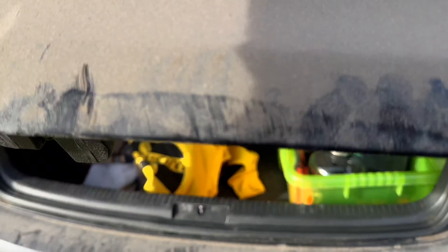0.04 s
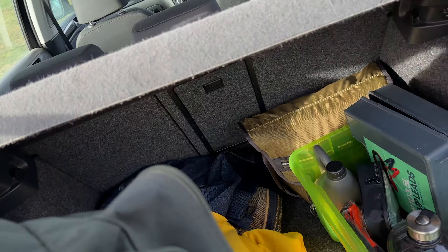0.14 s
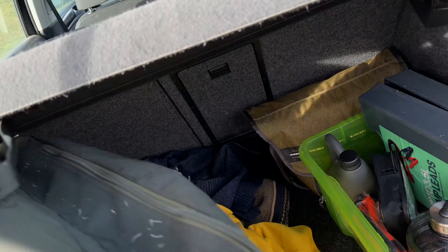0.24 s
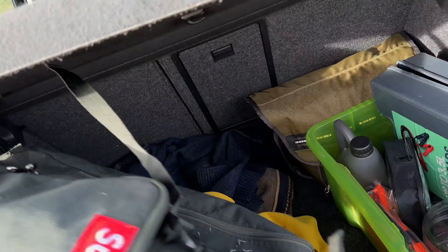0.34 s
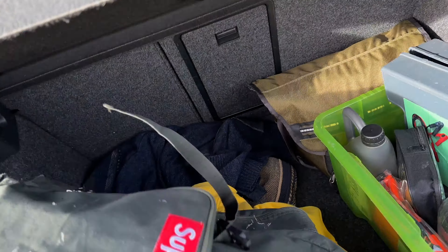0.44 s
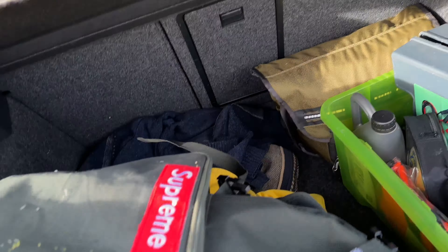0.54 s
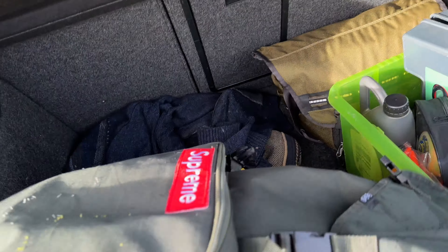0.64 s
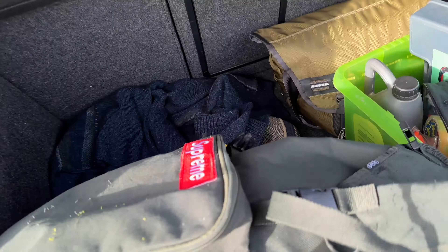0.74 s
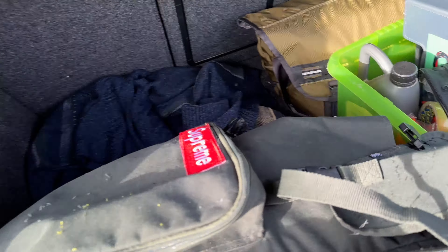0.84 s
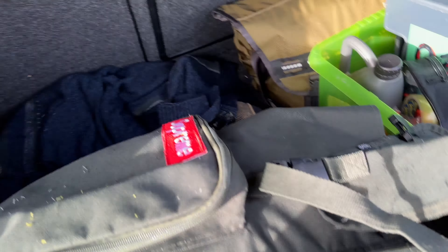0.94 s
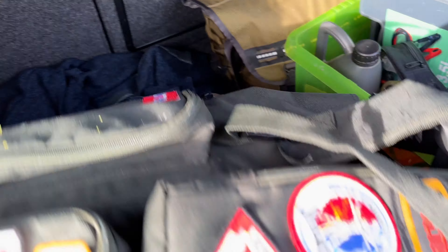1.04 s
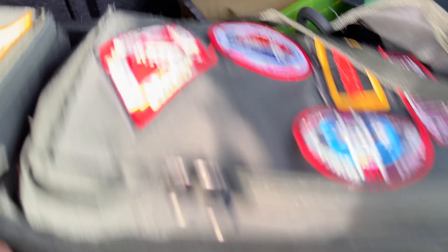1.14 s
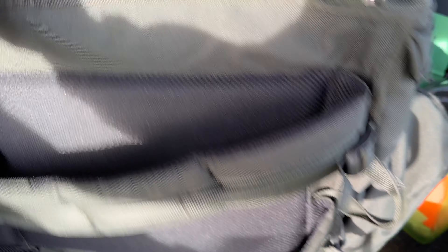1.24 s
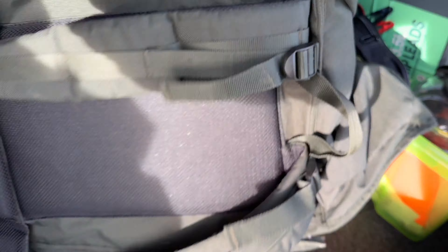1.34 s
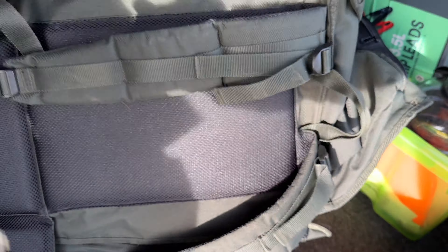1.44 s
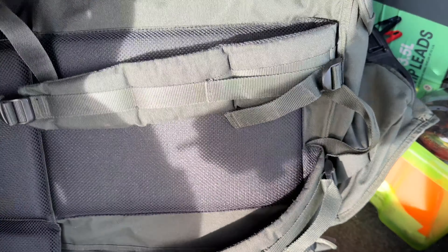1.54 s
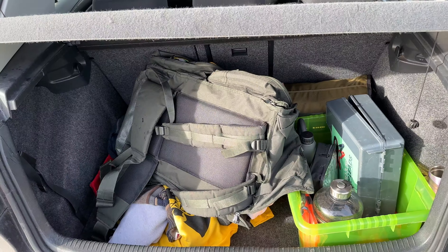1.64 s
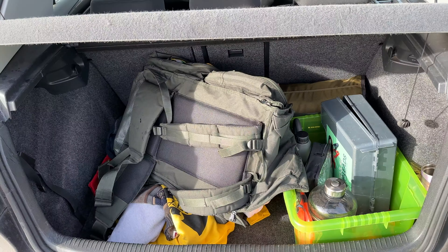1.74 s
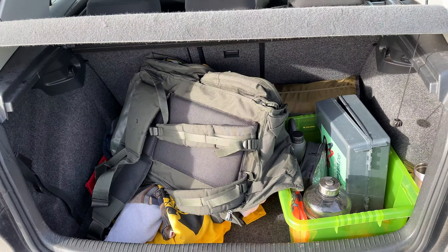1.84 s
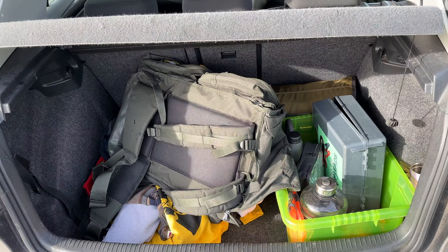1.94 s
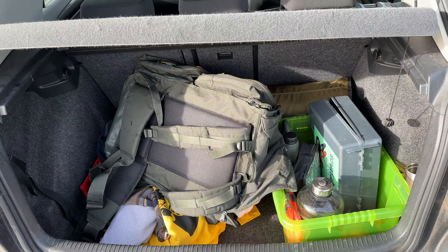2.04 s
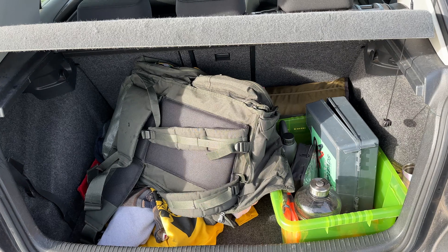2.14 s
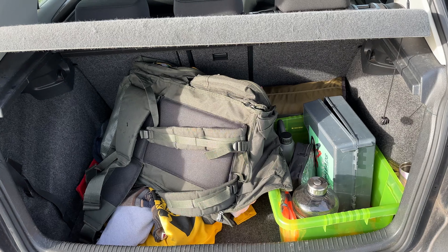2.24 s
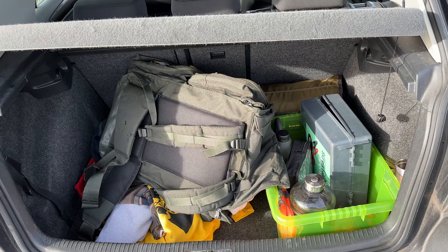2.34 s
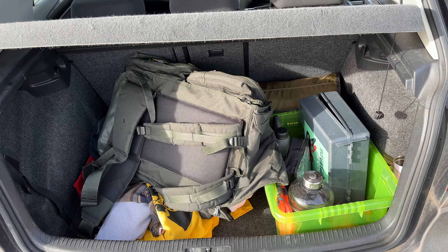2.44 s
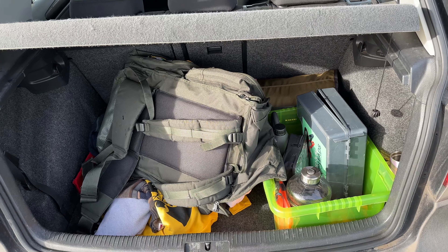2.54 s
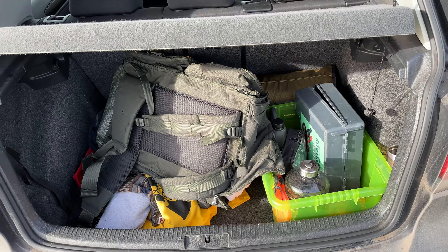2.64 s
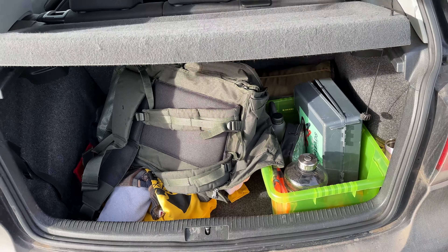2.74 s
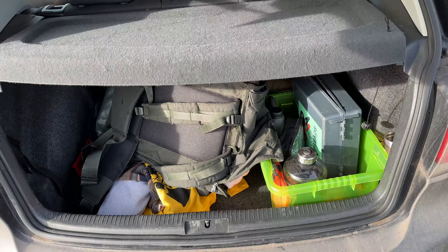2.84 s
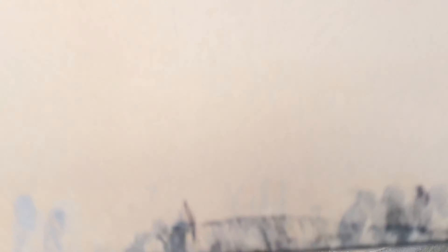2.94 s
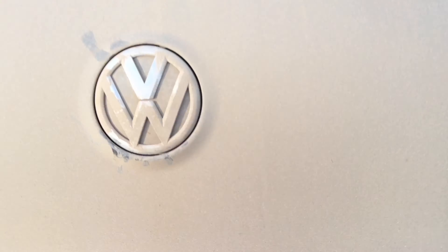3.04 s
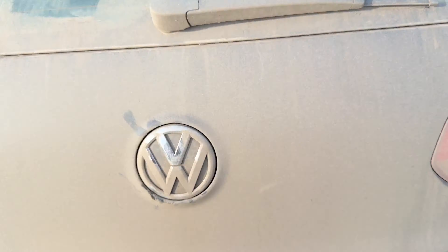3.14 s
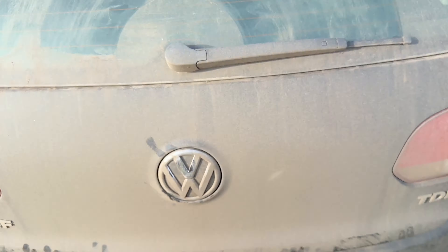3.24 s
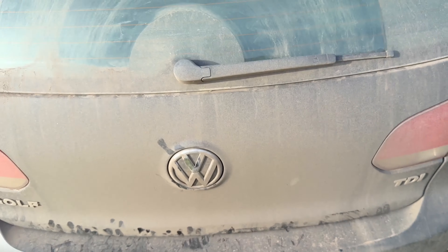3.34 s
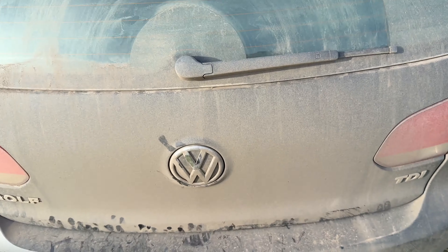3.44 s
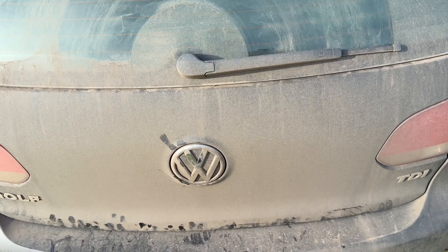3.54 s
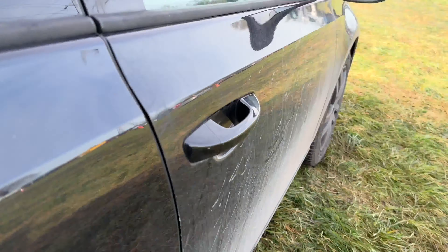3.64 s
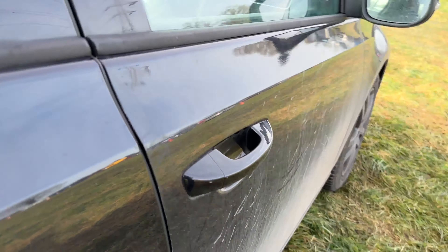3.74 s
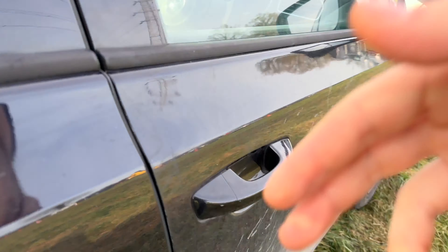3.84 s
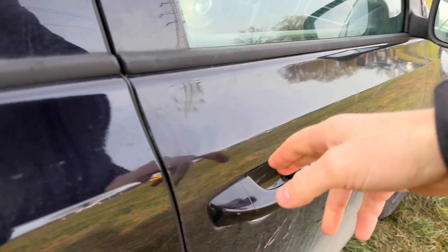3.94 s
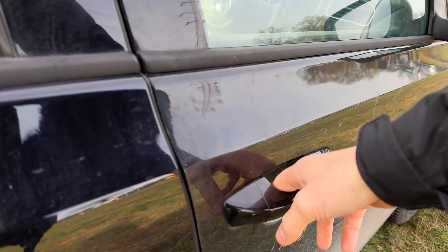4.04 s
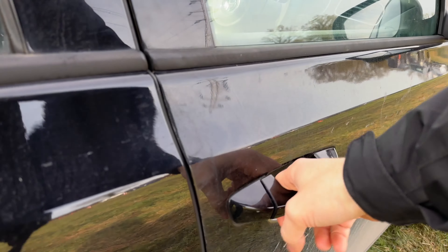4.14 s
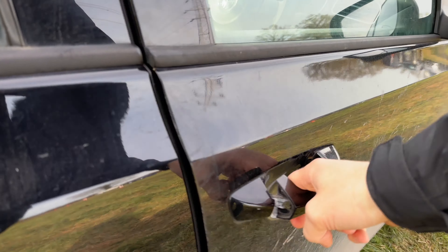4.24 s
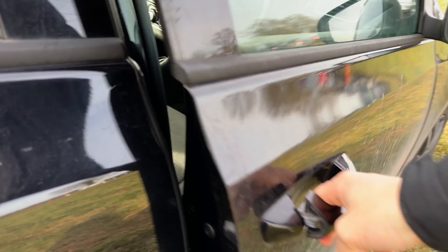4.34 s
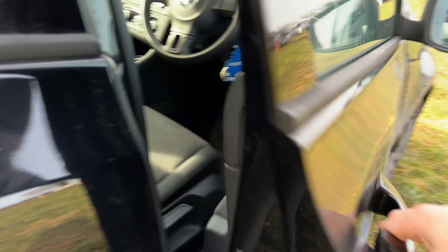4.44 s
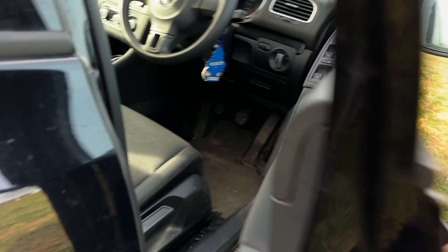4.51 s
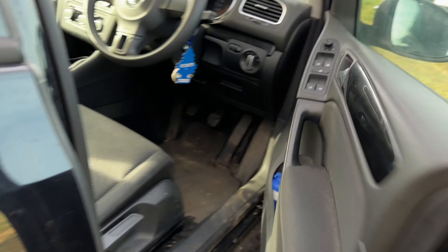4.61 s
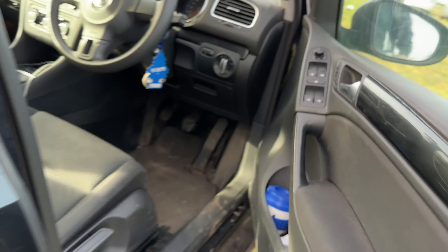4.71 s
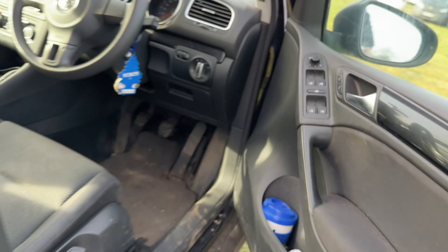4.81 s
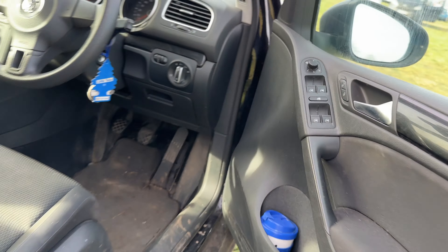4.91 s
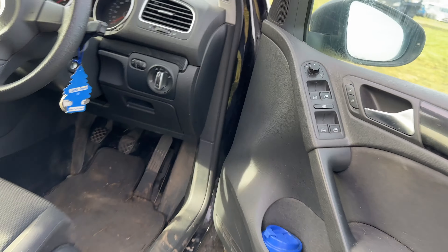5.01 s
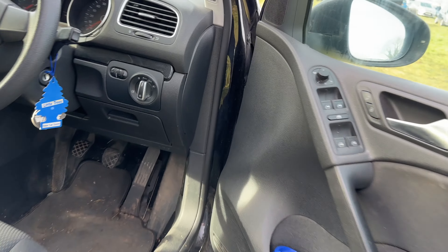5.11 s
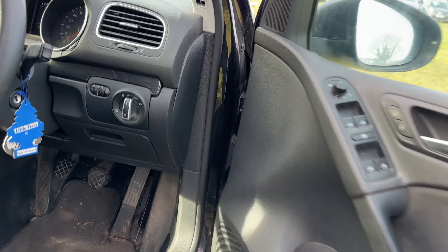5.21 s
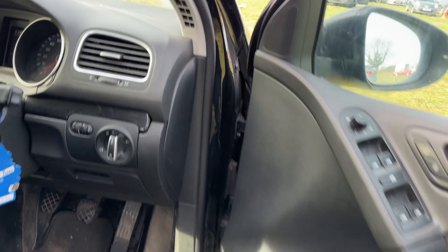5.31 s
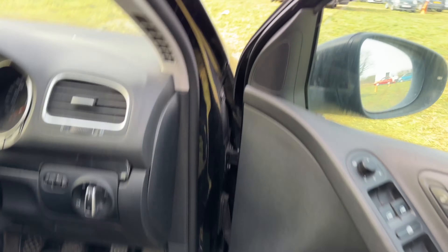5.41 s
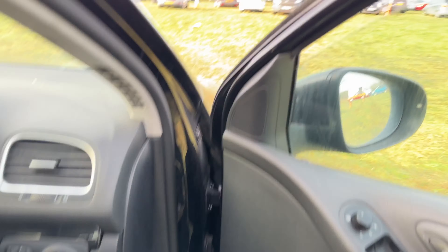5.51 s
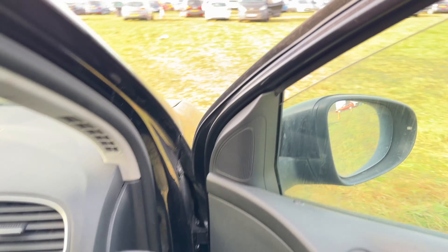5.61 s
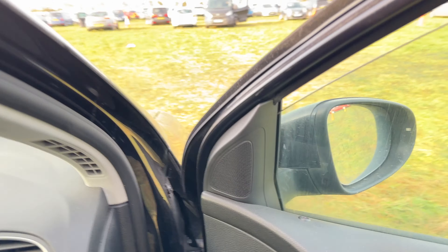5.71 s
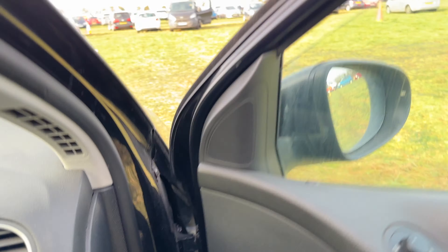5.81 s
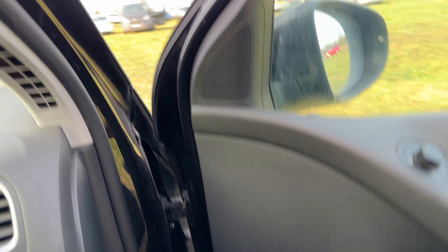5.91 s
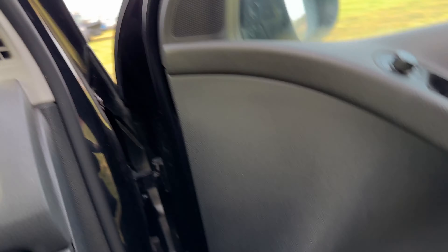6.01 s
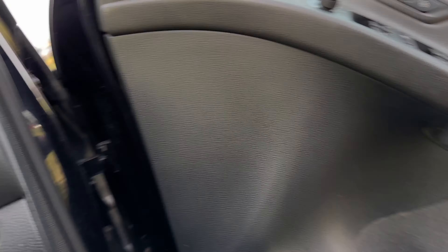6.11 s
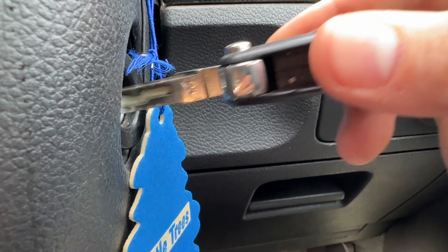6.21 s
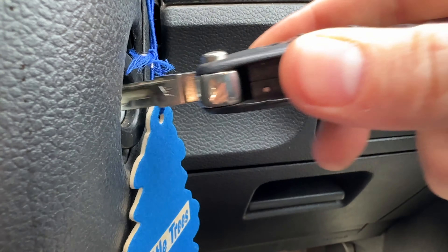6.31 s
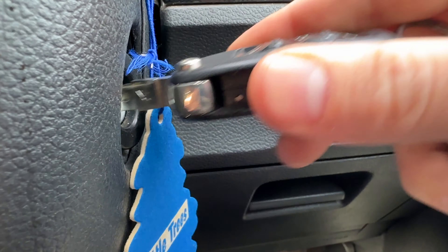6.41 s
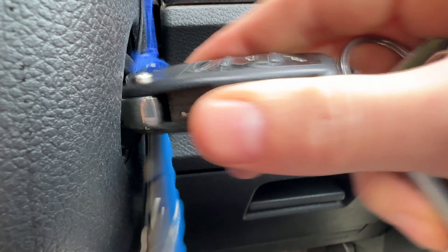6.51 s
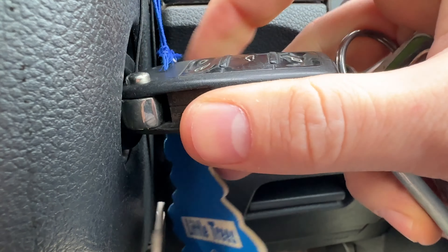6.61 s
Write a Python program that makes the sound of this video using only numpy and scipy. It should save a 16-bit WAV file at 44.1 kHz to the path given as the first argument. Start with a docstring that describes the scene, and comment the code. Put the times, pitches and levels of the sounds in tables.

```python
"""Outdoors at a parked hatchback, close to a handheld device, in a few abruptly joined moments.
A nylon backpack is shoved into the boot: padded panel knocks, buckle clicks, grainy scrape and hiss.
The tailgate grip clacks, struts groan by stick-slip, the lock's noise bursts slam, rattle and ring the shell.
Fingers tick on the device; a handle is pulled, the catch lets go, the door's stay snaps over its notch.
A jacket rustles as filtered noise, cloth squeaks on the seat, keys ring in modes; breeze and motor hum lie under."""
import sys
import numpy as np
from scipy import signal
from scipy.fft import rfft, irfft, next_fast_len
from scipy.io import wavfile
from scipy.ndimage import uniform_filter1d, map_coordinates

SR = 44100
rng = np.random.default_rng(int(sys.argv[2]) if len(sys.argv) > 2 else 0)


def file_out(sig):
    """Save sig as 16-bit WAV at sys.argv[1]."""
    # one column per channel
    cols = np.atleast_2d(sig).T
    # limit, then scale
    lim = np.clip(cols, -1, 1)
    pcm = np.round(lim * 32767).astype(np.int16)
    wavfile.write(sys.argv[1], SR, pcm)


N = 293957
TIME_S = np.arange(N) / SR
AGE_S = np.arange(SR // 2) / SR

# Table levels are relative: layers and their spectra scale them again.
# joints that cut off ringing sounds: t/s
JOINTS_S = [0.157, 1.66, 3.632, 7]

# tailgate lock strikes and catches: t/s, level/dB, treble/dB
LOCK_STRIKES = [(3.289,-9.5,-14), (3.297,-6.5,-1), (3.304,-4,-12), (3.311,-5,-9), (3.319,-8,-42),
                (3.337,-20,7), (3.374,-15.5,-18)]
# tailgate grip clacks: t/s, level/dB, treble/dB
GRIP_CLACKS = [(2.269, -17, -5), (2.273, -13.5, -14), (2.282, -42, -27)]
# handle pulled, catch lets go, door jolts on its hinges: t/s, level/dB, treble/dB
HANDLE_CONTACTS = [(4.163,-27,-7), (4.183,-21.5,-36), (4.216,-24,-11), (4.227,-20,-48), (4.241,-20.5,-13),
                   (4.262,-20,-16), (4.270,-44,-15), (4.293,-31,-3), (4.497,-21,-29), (4.768,-23.5,-24)]
# door stay snaps over its notch: t/s, level/dB, treble/dB
STAY_SNAPS = [(4.649,-23.5,-38), (4.657,-16,1), (4.660,-8,23), (4.665,-13,-25), (4.677,-16,-34)]
# soft blows on boot floor, handle and seat: t/s, level/dB, f/Hz, tick/dB
KNOCKS = [(0.129,-5,582,-18), (0.149,-5,296,-22), (0.218,-9.5,800,-6), (0.229,-0.5,416,-15),
          (0.242,-3.5,154,-23.5), (0.356,-13,726,-18), (0.397,-18.5,166,-5.5), (0.993,-15.5,493,-11),
          (1.075,-23.5,560,-2.5), (1.109,-10.5,266,-13), (1.214,-18.5,168,-22), (1.308,-5.5,453,-29),
          (1.322,-12,122,-6.5), (1.862,-15.5,265,-26), (1.914,-12.5,255,-27), (2.948,-18,392,-20),
          (3.126,-24,255,-17.5), (4.226,-12,963,-30), (4.228,-11,232,-36), (4.271,-17,110,-14),
          (4.678,-12.5,188,-9), (5.921,-5,237,-33)]
# buckles and other small hard parts: t/s, level/dB, f/Hz, t60/s
SNAPS = [(0.1293,-7.5,5070,0.0065), (0.157,-8.5,3770,0.002), (0.219,-13,1530,0.057), (0.341,-17,2720,0.044),
         (0.457,-33,1180,0.02), (0.539,-27.5,2900,.04), (0.623,-19.5,3000,0.084), (0.993,-23.5,2070,0.024),
         (1.155,-16,1330,0.012), (1.238,-17,1880,0.031), (1.319,-13.5,2560,0.035), (1.448,-26.5,1620,0.051),
         (2.691,-25.5,2590,0.016), (4.269,-24,2220,0.02), (5.777,-13.5,2020,0.013), (5.985,-18,1190,0.021),
         (6.154,-25,1680,0.022), (6.214,-25,4830,0.13), (6.2315,-7,3550,0.021), (6.299,-25,8400,0.0093),
         (6.498,-9,3080,.011)]
# fingers tick on the device's case, beside its left port: t/s, level/dB
TAPS = [(3.633,-26.5), (3.641,-22.5), (3.682,-18), (5.252,-23), (5.337,-26.5), (5.387,-22)]
# keys swing against their ring: t/s, level/dB, ring/dB
JINGLES = [(6.357,-29,-28), (6.441,-29,-26), (6.466,-25,-24), (6.5,-11,-17), (6.657,-24,-22)]
# shoves of the backpack: start/s, length/s, scrape/dB, hiss/dB
SHOVES = [(0.19,1.2,-37.5,-45), (0.335,0.09,-26.5,-37), (0.53,.14,-61,-45), (0.84,0.069,-59,-40),
          (1.14,0.19,-37.5,-37.5)]
# moves of arms and body in the jacket: start/s, length/s, scuff/dB, hiss/dB
MOVES = [(1.66,0.081,-51.5,-55), (2.47,.45,-54.5,-57), (2.62,.28,-49.5,-52), (2.99,0.033,-40.5,-39.5),
         (3.635,0.18,-48,-55), (3.83,0.23,-45.5,-48), (4.2,0.27,-57,-58.5), (5.06,0.51,-51,-53),
         (5.44,0.26,-44,-42), (5.7,0.4,-49,-46), (5.96,0.3,-40.5,-40), (6.39,0.16,-49,-46.5)]
# cloth squeaks on the seat: start/s, length/s, f/Hz, glide/(octave/s), level/dB
SQUEAKS = [(5.554,0.028,642,-24,-40), (5.682,0.059,995,-16,-38), (5.767,0.042,2340,7.5,-48)]
# device jostled and buffeted by air: start/s, length/s, rumble/dB, flutter/dB
JOSTLES = [(0.83,0.039,-30,-38), (1.29,0.067,-24.5,-36), (1.56,0.033,-30.5,-66), (2.87,0.15,-26.5,-29),
           (3.45,0.23,-39.5,-51), (4.2,0.665,-36,-47), (5.01,0.12,-32,-47.5), (5.8,0.22,-29,-45)]
# distant motor: t/s, level/dB
HUM_LEVEL = [(1.7, -51.5), (2.95, -41), (3.13, -49.5), (3.81, -36.5), (5.7, -51), (5.97, -41),
             (6.37, -58.5), (6.6, -49)]
# steady background of each moment: start/s, air/dB, air hiss/dB, breeze/dB, flutter/dB
MOMENTS = [(0,-50,-55,-37,-52), (1.662,-57.5,-63.5,-41.5,-50), (3.09,-59,-75,-43.5,-49.5),
           (3.632,-57,-59,-38,-48), (6.28,-54,-60.5,-44,-55)]
# device turns, left port lags the right by: t/s, lag/s
TURN = [(0.5, -.00005), (1.25, -.0003), (1.8, -.0007), (2.4, -.0007), (3.3, -.0001), (3.7, .0004),
        (4.25, -.00004), (4.7, .0001), (5.2, .0004)]

# modes of the car's shell: f/Hz, level/dB, t60/s
SHELL_MODES = [(131.9, -1.5, 0.67), (212.7, 11.5, 0.18), (274, -6.5, 0.59), (397, -33, 0.38),
               (550, -9, 0.27), (644, -26, 0.18), (912, -19, 0.14), (1220, -2, 0.087), (1600, -33, .2),
               (1640, -16, .2), (2080, -9, 0.36)]
# modes of the keys: f/Hz, level/dB, t60/s
KEY_MODES = [(7440, -10, .1), (8700, -6, 0.07), (10100, -6, 0.046), (10610, 2.5, 0.05), (11040, 2, 0.035),
             (12100, -14, .1), (13030, -14, .1), (13810, -8, .07), (14190, 0, .12)]
# tailgate lock spectrum: f/Hz, level/dB
LOCK_TONE = [(88, -22), (150, -11.5), (524, 1), (941, -5), (1260, -3), (1660, -15), (2060, -10.5),
             (2600, -21), (3040, -22), (4160, -24.5), (4760, -17), (6260, -30.5), (10200, -27),
             (11500, -34.5), (16000, -31)]
# tailgate grip spectrum: f/Hz, level/dB
GRIP_TONE = [(180, -25), (300, -9), (624, -2.5), (762, -23), (1080, -2), (1300, -17), (1430, -2),
             (1840, -8), (2520, -5), (3830, -15.5), (5430, -14.5), (5900, -21), (6740, -19), (10200, -30),
             (16000, -47)]
# strut and seal spectrum: f/Hz, level/dB
STRUT_TONE = [(290, -30), (500, -2.5), (648, -4), (758, -21), (832, 5.5), (993, -15), (1040, 4), (1330, -1),
              (1440, 4), (1800, -10), (6000, -24), (7800, -57), (13200, -120)]
# door handle spectrum: f/Hz, level/dB
HANDLE_TONE = [(180, -6), (300, -7), (462, -6.5), (555, -11.5), (930, -12.5), (1150, -19), (1320, -19.5),
               (2570, -24.5), (3520, -31.5), (5160, -39), (7200, -47), (10200, -39.5), (16000, -56)]
# door stay spectrum: f/Hz, level/dB
STAY_TONE = [(120, -23), (200, -7.5), (432, -16.5), (601, -7), (1040, -7.5), (1270, -6), (1870, -11),
             (2860, -14), (4600, -22), (6050, -14), (7830, -32.5), (10100, -30), (11100, -40), (14900, -41),
             (16000, -46)]
# backpack scrape spectrum: f/Hz, level/dB
NYLON_SCRAPE = [(120, -41), (200, -12), (354, -4.5), (486, -7), (540, -9.5), (607, -5.5), (2500, -21.5),
                (3250, -33), (5500, -120)]
# backpack hiss spectrum: f/Hz, level/dB
NYLON_HISS = [(1290,-3), (2200,-9), (3300,-2.5), (6470,-8), (8000,-5), (10000,-5.5), (12500,-15.5),
              (16000,-13)]
# jacket scuff spectrum: f/Hz, level/dB
JACKET_SCUFF = [(180, -49), (300, -3.5), (476, -2), (735, -2.5), (817, -1.5), (1100, -6), (2090, -7.5),
                (2500, -11.5), (3250, -13.5), (5500, -120)]
# jacket hiss spectrum: f/Hz, level/dB
JACKET_HISS = [(1290,-12), (2200,-10.5), (3400,-5.5), (4200,-5.5), (5600,-3), (8270,-9.5), (10000,-8.5),
               (12000,-15.5), (16000,-18)]
# wind rumble spectrum: f/Hz, level/dB
RUMBLE_TONE = [(15, -12), (33, -15), (47, -5), (60, 0), (80, -4), (110, -6.5), (170, -30), (400, -100)]
# wind flutter spectrum: f/Hz, level/dB
FLUTTER_TONE = [(60, -42), (120, -0.5), (165, 1), (250, -5.5), (350, -14.5), (800, -52)]
# left-right likeness of diffuse sound: f/Hz, coherence/1
DIFFUSE = [(60, 0.86), (140, 0.79), (300, 0.69), (650, 0.35), (1400, 0.036), (7000, 0.12), (12000, 0.89)]
# left-right likeness of near blows: f/Hz, coherence/1
DIRECT = [(100, 0.95), (400, 0.94), (1200, 0.14), (4000, 0.45), (12000, 0.64)]
# decay of the tailgate lock: f/Hz, t60/s
LOCK_DECAY = [(150, 0.47), (600, 0.034), (2000, 0.14), (5000, 0.093), (14000, .05)]
# decay of the door stay: f/Hz, t60/s
STAY_DECAY = [(200, 0.42), (1000, 0.1), (3000, 0.075), (7000, 0.032), (14000, 0.03)]

RATTLE_START_S, RATTLE_GAP_S = 3.394, 0.05
RATTLE_DB, RATTLE_LOSS_DB, RATTLE_TREBLE_DB, RATTLE_DULLING_DB = -22, 5, -16, 12
STRUT_START_S, STRUT_LENGTH_S, STRUT_ATTACK_S, STRUT_RELEASE_S = 2.7, 0.16, 0.018, 0.04
STRUT_DB, STRUT_GAS_DB, SLIP_HZ, WEAK_SLIP_DB = -41.5, -0.5, 105.6, -2
# base decay at the reference pitch; higher panels die sooner
KNOCK_REF_HZ, KNOCK_BASE_T60_S, KNOCK_SLOPE, KNOCK_PAN_DB = 236, 0.12, 0.45, -2
SNAP_PAN_DB, FACING_DB = -0.5, 8  # left over right; more as the left port's lag grows
TAP_HZ, TAP_T60_S, TAP_PAN_DB = 4350, 0.013, 28
REBOUND_S, REBOUND_LOSS_DB = 0.01, 5.5  # nominal gap, loss per rebound
SHOVE_ATTACK_S, SHOVE_RELEASE_S = 0.018, 0.04
ZIP_HZ, ZIP_T60_S, ZIP_DB = 9800, 0.024, 6  # dB over the hiss gain
CREASE_HZ, CREASE_T60_S, CREASE_DB = 1900, 0.014, 11  # dB over the hiss gain
MOVE_ATTACK_S, MOVE_RELEASE_S = 0.031, 0.034
FOLD_HZ, FOLD_T60_S, FOLD_DB = 1400, 0.016, 1  # dB over the scuff gain
JOSTLE_ATTACK_S, JOSTLE_RELEASE_S = 0.011, 0.054
DRAUGHT_DB, DRAUGHT_FLUTTER_DB = -1.5, -4.5  # air stirred by the cloth, relative to its scrape
HUM_HZ = 115.1
TOP_HZ = 16000


def tailgate():
    """The grip clacks, struts slide, lock strikes and rattles, shell rings and trapped cabin air booms."""
    grip_decay = [(300, 0.14), (2500, 0.062), (12000, 0.047)]
    out = amp(-8.5) * latch(GRIP_CLACKS, GRIP_TONE, grip_decay, bright_db=5.0)
    out += struts()
    # even rattle, each time weaker and duller
    rattles = [
        (RATTLE_START_S + k * RATTLE_GAP_S,
         RATTLE_DB - k * RATTLE_LOSS_DB,
         RATTLE_TREBLE_DB - k * RATTLE_DULLING_DB)
        for k in range(3)
    ]
    out += amp(-7.5) * latch(LOCK_STRIKES + rattles, LOCK_TONE, LOCK_DECAY, bright_db=6.5)
    add(out, 3.303, amp(-19.5) * ring(SHELL_MODES, spread=0.2) * rise(0.0098))
    boom = np.sin(2 * np.pi * 62 * AGE_S) * rise(0.00099) * fade(0.23)
    add(out, 3.330, amp(-5.0) * boom)
    upper_boom = np.sin(2 * np.pi * 116 * AGE_S) * rise(0.0035) * fade(0.3)
    add(out, 3.335, amp(-17) * upper_boom)
    tone = [(40, 13.0), (150, 3.5), (500, -12.0), (2000, -30), (5000, -52), (12000, -51)]
    surroundings = noise(tone, DIFFUSE, size=len(AGE_S))
    add(out, 3.32, amp(-10.5) * surroundings * rise(0.0089) * fade(0.41))
    return out


def struts():
    """Seals stick and slip, strongly and weakly by turns: a pitched groan over the hiss of the gas."""
    cycles = np.floor(np.cumsum(SLIP_HZ * (1 + 0.006 * wobble(30))) / SR)
    slips = np.diff(cycles, prepend=0) * amp(WEAK_SLIP_DB * (cycles % 2))
    tube = noise(STRUT_TONE, DIFFUSE, size=len(AGE_S)) * fade(0.03)
    groan = unit(signal.fftconvolve(slips[None], tube, axes=1)[:, :N])
    gas = amp(STRUT_GAS_DB) * noise(STRUT_TONE, DIFFUSE)
    slide = strokes([(STRUT_START_S, STRUT_LENGTH_S, STRUT_DB)], STRUT_ATTACK_S, STRUT_RELEASE_S)
    return slide * (groan + gas)


def latch(contacts, tone, decay, bright_db):
    """Steel parts strike in quick succession and shake the panel around them."""
    out = np.zeros((2, N))
    usual_db = np.mean([row[2] for row in contacts])
    for s, db, treble_db in contacts:
        tilt_db = treble_db - usual_db + bright_db
        colour = [(hz, level + tilt_db * hz / (hz + 4000)) for hz, level in tone]
        strike = dying(noise(colour, DIRECT, size=len(AGE_S)), decay)
        add(out, s, amp(db) * strike * rise(0.000057))
    return out


def door():
    """The handle works the catch inside the hollow door; the opening door rides over its stay's notch."""
    handle_decay = [(300, 0.21), (1000, 0.087), (4000, 0.092), (12000, 0.042)]
    pull = amp(-6.5) * latch(HANDLE_CONTACTS, HANDLE_TONE, handle_decay, bright_db=4.0)
    stay = amp(-3.0) * latch(STAY_SNAPS, STAY_TONE, STAY_DECAY, bright_db=12)
    return pull + stay


def knocks():
    """A padded blow: a few cycles of a hollow panel, a dull scatter and a tick of contact."""
    out = np.zeros((2, N))
    tick_tone = [(400, -13.0), (1200, 6.5), (2500, -6.0), (5000, -18), (15000, -28)]
    for s, db, hz, tick_db in KNOCKS:
        t60 = KNOCK_BASE_T60_S * (KNOCK_REF_HZ / hz) ** KNOCK_SLOPE
        panel = np.sin(2 * np.pi * hz * AGE_S) * fade(0.35 * t60) * rise(0.00047)
        colour = [(hz / 8, -14), (hz / 2, -2), (hz, 0), (hz * 1.74, -13), (hz * 3, -31), (hz * 12, -65)]
        scatter = noise(colour, DIRECT, KNOCK_PAN_DB, size=len(AGE_S))
        scatter = dying(scatter, [(150, 1.32 * t60), (1500, 1.14 * t60)]) * rise(0.0016)
        tick = noise(tick_tone, DIRECT, KNOCK_PAN_DB, size=len(AGE_S)) * fade(0.1) * rise(0.00013)
        blow = amp(-2.5) * panel + amp(-7.5) * scatter + amp(tick_db - 4.0) * tick
        add(out, s, amp(db) * blow)
    return out


def snaps():
    """Hard parts click as short pitched noise, louder on the left as the left port's lag grows."""
    out = np.zeros((2, N))
    lag_s, = curves(TURN)
    for s, db, hz, t60 in SNAPS:
        facing = max(lag_s[round(s * SR)] / lag_s.max(), 0)
        add(out, s, amp(db) * click(hz, t60, SNAP_PAN_DB + FACING_DB * facing))
    return amp(-6) * out


def taps():
    """Fingers tick on the case: short noise clicks, strongly left in the treble."""
    out = np.zeros((2, N))
    for s, db in TAPS:
        add(out, s, amp(db) * click(TAP_HZ, TAP_T60_S, TAP_PAN_DB))
    return amp(-6) * out


def click(hz, t60, pan_db):
    """A small hard part clicks around a pitch of its own, with a faint longer tail."""
    colour = [(hz / 20, -15), (hz / 4, -8), (hz / 2, -7), (hz, 0),
              (hz * 2, -9), (hz * 3.3, -21), (hz * 10, -31)]
    decay = fade(t60) + amp(-29) * fade(0.32)
    return noise(colour, DIRECT, pan_db, size=len(AGE_S)) * decay * rise(0.0001)


def keys():
    """Each touch is a bright tick and a short ring of the blades, with a few uneven rebounds."""
    out = np.zeros((2, N))
    tone = [(800, -4.0), (6000, -12.5), (10500, -4), (12500, -11), (15500, -9)]
    for s, db, ring_db in JINGLES:
        for k in range(4):
            tick = noise(tone, DIRECT, pan_db=3.5, size=len(AGE_S)) * fade(0.032)
            blades = amp(ring_db) * ring(KEY_MODES, spread=0.77)
            touch = (blades + amp(-4.0) * tick) * rise(0.00014)
            at_s = s + k * REBOUND_S * rng.uniform(0.58, 1.7)
            add(out, at_s, amp(db - k * REBOUND_LOSS_DB) * touch)
    return out


def backpack(scrape_gain, hiss_gain):
    """Stiff nylon scrapes and crackles over the boot's carpet while its zip pulls tinkle."""
    catching = grains(rate=470, size_db=4.0, life_s=0.0047)
    scrape = patchy(noise(NYLON_SCRAPE, DIFFUSE, pan_db=-1.0) * catching, depth_db=2.5)
    threads = 0.35 * catching + grains(rate=1200, size_db=3.5, life_s=0.0008)
    hiss = patchy(noise(NYLON_HISS, DIFFUSE, pan_db=3.5) * threads, depth_db=2.5)
    # background air shares the cloth's noise
    air, air_hiss = background()[:2]
    cloth = np.hypot(scrape_gain, air) * scrape + np.hypot(hiss_gain, air_hiss) * hiss
    zips = amp(ZIP_DB) * crackles(hiss_gain, ZIP_HZ, ZIP_T60_S, spread=0.074, count=22)
    creases = amp(CREASE_DB) * crackles(hiss_gain, CREASE_HZ, CREASE_T60_S, spread=0.41, count=36)
    return (cloth + zips + creases) * (TIME_S < JOINTS_S[1])


def jacket(scuff_gain, hiss_gain):
    """Sleeves swish with every move, finer and smoother than the bag; folds flick over."""
    scuff = patchy(noise(JACKET_SCUFF, DIFFUSE), depth_db=2.2)
    threads = grains(rate=4500, size_db=2.5, life_s=0.0019)
    hiss = patchy(noise(JACKET_HISS, DIFFUSE, pan_db=5.0) * threads, depth_db=1.5)
    folds = amp(FOLD_DB) * crackles(scuff_gain, FOLD_HZ, FOLD_T60_S, spread=0.41, count=30)
    air, air_hiss = background()[:2]
    cloth = np.hypot(scuff_gain, air) * scuff + np.hypot(hiss_gain, air_hiss) * hiss
    return (cloth + folds) * (TIME_S >= JOINTS_S[1])


def seat():
    """Cloth slips on the seat in short, unsteady squeaks: gliding sines."""
    out = np.zeros((2, N))
    for s, length_s, hz, glide, db in SQUEAKS:
        pitch_hz = hz * 2 ** (glide * AGE_S) * (1 + 0.04 * wobble(400)[:len(AGE_S)])
        squeak = np.sin(2 * np.pi * np.cumsum(pitch_hz) / SR)
        swell = np.sin(np.pi * np.minimum(AGE_S / length_s, 1))
        add(out, s, amp(db) * squeak * swell)
    return out


def outdoors(motion):
    """Breeze rumbles and flutters on the device, more with every move and jostle; a distant motor hums."""
    breeze, breeze_flutter = background()[2:]
    bump, flap = strokes(JOSTLES, JOSTLE_ATTACK_S, JOSTLE_RELEASE_S)
    rumble_gain = np.sqrt(breeze ** 2 + (amp(DRAUGHT_DB) * motion) ** 2 + bump ** 2)
    flutter_gain = np.sqrt(breeze_flutter ** 2 + (amp(DRAUGHT_FLUTTER_DB) * motion) ** 2 + flap ** 2)
    rumble = rumble_gain * noise(RUMBLE_TONE, DIFFUSE)
    flutter = flutter_gain * noise(FLUTTER_TONE, DIFFUSE)
    phase = 2 * np.pi * np.cumsum(HUM_HZ + 1.66 * wobble(6)) / SR
    hum = np.sqrt(2) * (np.sin(phase) + amp(-19.0) * np.sin(2 * phase))
    hum_gain = amp(curves(HUM_LEVEL)[0] + 0.97 * wobble(16))
    return rumble + flutter + hum_gain * hum


def background():
    """Steady gains of the moment that each sample falls in."""
    starts, *levels = np.transpose(MOMENTS)
    moment = np.maximum(np.searchsorted(starts, TIME_S, side='right') - 1, 0)
    return amp(levels)[:, moment]


def amp(db):
    """Decibels to gain."""
    return 10 ** (np.asarray(db) / 20)


def unit(x):
    """Scale to rms 1."""
    return x / np.sqrt(np.mean(x ** 2) + 1e-20)


def along(points, hz):
    """Interpolate (f/Hz, value) points on a log axis."""
    f, v = np.transpose(points)
    return np.interp(np.log(hz + 1), np.log(f + 1), v)


def curves(rows):
    """One value per sample for each column after the time."""
    s, *cols = np.transpose(rows)
    return [np.interp(TIME_S, s, c) for c in cols]


def wobble(rate):
    """A smooth random curve, rate knots a second."""
    knots = rng.standard_normal(int(N * rate / SR) + 4)
    return map_coordinates(knots, [TIME_S * rate])


def fade(t60):
    """Exponential decay, -60 dB at t60 (2 ms at least)."""
    return np.exp(-np.log(1000) * AGE_S / max(t60, 0.002))


def rise(seconds):
    """A soft start with this time constant."""
    return 1 - np.exp(-AGE_S / max(seconds, 1e-5))


def strokes(rows, attack_s, release_s):
    """Moves that rise, hold and die away: one gain curve per dB column after start and length."""
    power = 0
    for start, length, *levels in rows:
        age = np.maximum(TIME_S - start, 0)
        shape = (1 - np.exp(-age / attack_s)) * np.exp(-np.maximum(age - length, 0) / release_s)
        power = power + (amp(levels)[:, None] * shape) ** 2
    return np.sqrt(power)


def noise(spectrum, alike, pan_db=0, size=N):
    """Stereo noise of rms 1 with set coherence; the device shades one side more as pitch rises, from the low
    mids up."""
    m = next_fast_len(size)
    hz = np.fft.rfftfreq(m, 1 / SR)
    turn = np.arccos(np.clip(along(alike, hz), -1, 1)) / 2
    white = rfft(rng.standard_normal((2, m)))
    mid, side = white * amp(along(spectrum, hz)) * [np.cos(turn), np.sin(turn)]
    # shading weakens again above 7 kHz
    shade = amp(pan_db / 2 * hz / (hz + 500) * along([(7000, 1.0), (12000, 0.092)], hz))
    return unit(irfft([(mid + side) * shade, (mid - side) / shade], m)[:, :size])


def dying(x, decay):
    """Let each octave of a short sound die at its own speed."""
    z = rfft(x)
    hz = np.fft.rfftfreq(len(AGE_S), 1 / SR)
    octave = np.log2(np.clip(hz, 125, 16000))
    out = 0
    for centre in 125 * 2 ** np.arange(8):
        weight = np.maximum(1 - abs(octave - np.log2(centre)), 0)
        out = out + irfft(z * weight, len(AGE_S)) * fade(along(decay, centre))
    return out


def ring(modes, spread):
    """Modes struck at new strengths, each reaching the two sides with its own phase."""
    out = 0
    for hz, db, t60 in modes:
        phase = rng.uniform(0, 2 * np.pi) + spread * rng.standard_normal((2, 1))
        strength = amp(db + rng.normal(0, 1.6))
        out = out + strength * np.sin(2 * np.pi * hz * AGE_S + phase) * fade(t60)
    return out


def grains(rate, size_db, life_s):
    """Envelope of threads catching and slipping: many small ticks of uneven size."""
    sizes = amp(size_db * np.minimum(rng.exponential(size=N), 4))
    kicks = (rng.random(N) < rate / SR) * sizes
    keep = np.exp(-1 / (max(life_s, 1e-4) * SR))
    return unit(np.sqrt(signal.lfilter([1], [1, -keep], kicks ** 2)))


def patchy(x, depth_db):
    """Folds of cloth come and go: each favours its own band for a moment."""
    z = signal.stft(x, nperseg=256)[2]
    field = rng.standard_normal(z.shape[1:])
    field = uniform_filter1d(field, size=4, axis=0)  # over frequency
    field = uniform_filter1d(field, size=7, axis=1)  # over time
    return unit(signal.istft(z * amp(depth_db * unit(field)), nperseg=256)[1][:, :N])


def crackles(effort, hz, t60, spread, count):
    """Ticks at random moments, denser and louder with the effort, each at a slightly different pitch."""
    out = np.zeros((2, N))
    work = np.cumsum(effort)
    for share, size, detune in zip(rng.random(count), *rng.standard_normal((2, count))):
        at = np.searchsorted(work, share * effort.sum())
        centre = hz * np.exp(spread * detune)
        colour = [(centre / 3, -24), (centre * 0.41, -12), (centre, 0), (centre * 1.2, -12), (centre * 3, -24)]
        tick = noise(colour, DIRECT, size=len(AGE_S)) * fade(t60)
        add(out, at / SR, effort[at] * amp(3 * size) * tick)
    return out


def add(track, s, sound):
    """Lay a sound in at s; it stops at the next joint."""
    start = min(round(s * SR), N)
    joint_s = min(j for j in JOINTS_S if j > s)
    end = min(N, start + len(AGE_S), round(joint_s * SR))
    track[:, start:end] += sound[..., :end - start]


def ports(x):
    """Delay one side against the other; the finest treble stays centred."""
    m = next_fast_len(N + SR // 2)
    lowpass = 1 / (1 + (np.fft.rfftfreq(m, 1 / SR) / 9000) ** 140)
    low = irfft(rfft(x, m) * lowpass, m)[:, :N]
    half_lag_s = curves(TURN)[0] / 2
    shifted = [map_coordinates(side, [(TIME_S + sign * half_lag_s) * SR], order=3)
               for side, sign in zip(low, (-1, 1))]
    return np.array(shifted) + x - low


def scene():
    """Near sounds reach the two ports apart; the outdoor rumble comes from all around."""
    scrape, bag_hiss = strokes(SHOVES, SHOVE_ATTACK_S, SHOVE_RELEASE_S)
    scuff, sleeve_hiss = strokes(MOVES, MOVE_ATTACK_S, MOVE_RELEASE_S)
    near = tailgate() + door() + knocks() + snaps() + taps() + keys()
    near += backpack(scrape, bag_hiss) + jacket(scuff, sleeve_hiss) + seat()
    balance = amp([[0.5], [-0.5]])  # left, right
    return (ports(near) + outdoors(scrape + scuff)) * balance


def record(dry):
    """The device thins the deepest bass, rounds off the highest peaks and cuts steeply above its band limit."""
    thinned = signal.sosfilt(signal.butter(4, 38, 'highpass', fs=SR, output='sos'), dry)
    held = thinned / (1 + np.abs(thinned / 0.8) ** 6) ** (1 / 6)
    m = next_fast_len(N + SR // 2)
    band = 1 / (1 + (np.fft.rfftfreq(m, 1 / SR) / TOP_HZ) ** 120)
    return irfft(rfft(held, m) * band, m)[:, :N]


dry = scene()
out = record(dry)
file_out(out)
```